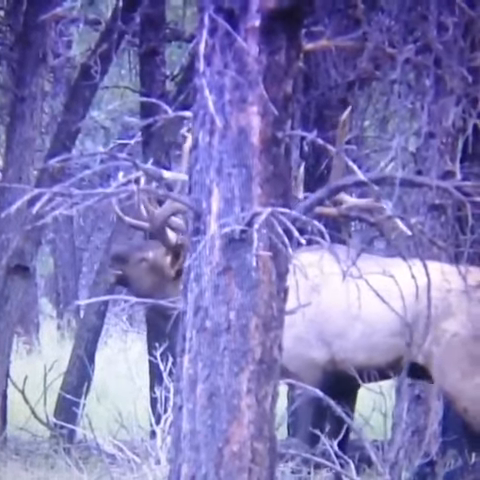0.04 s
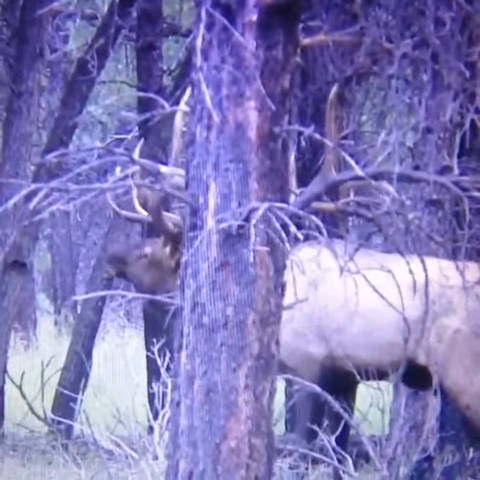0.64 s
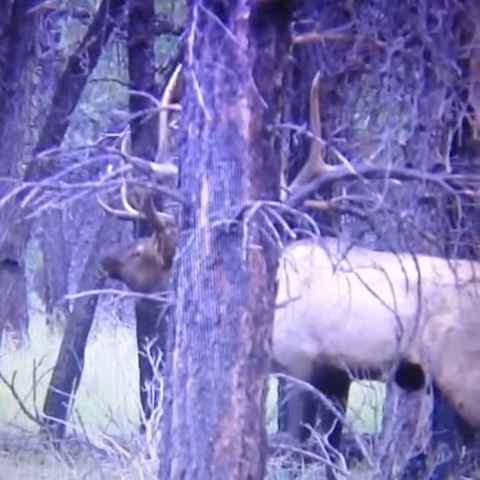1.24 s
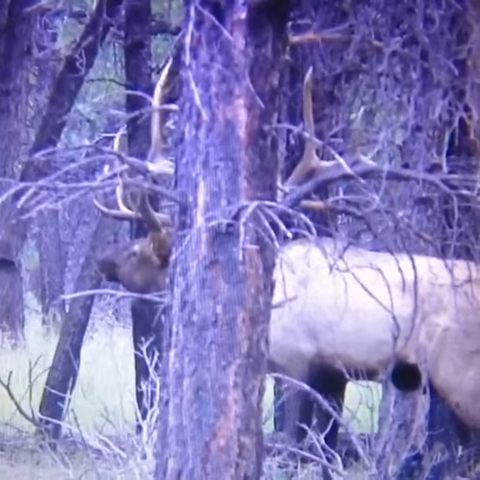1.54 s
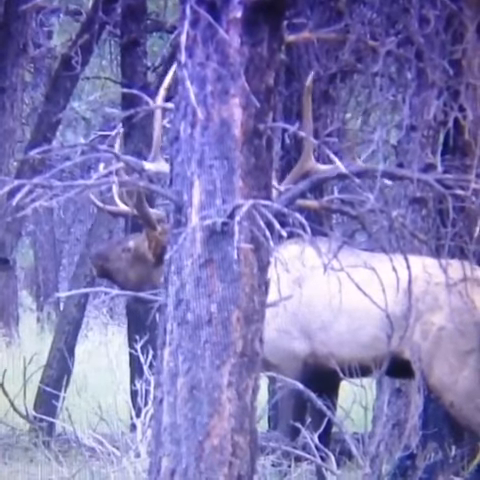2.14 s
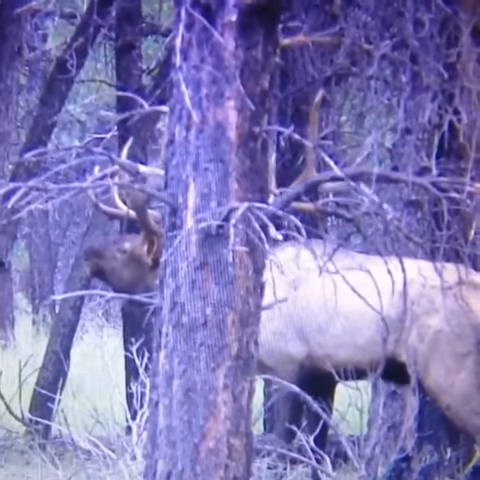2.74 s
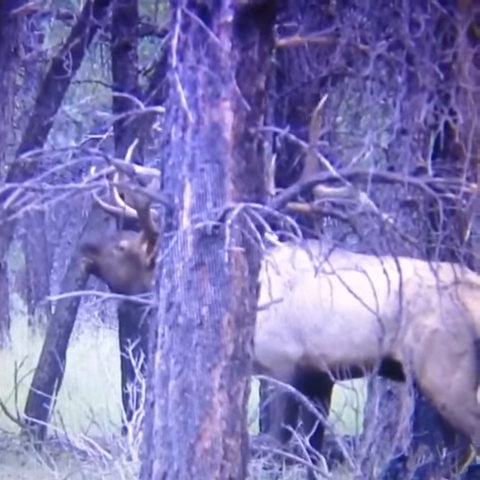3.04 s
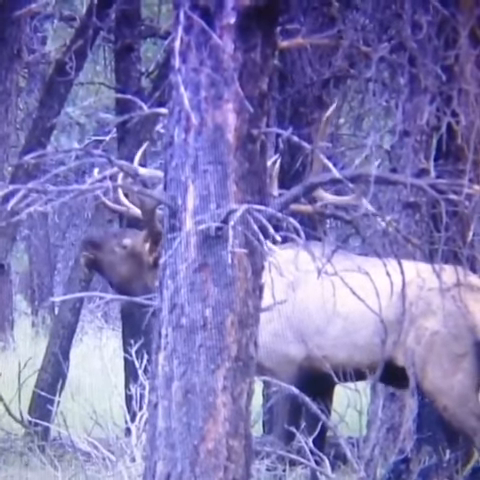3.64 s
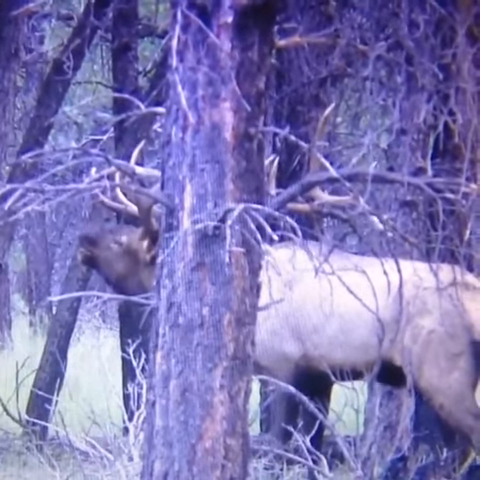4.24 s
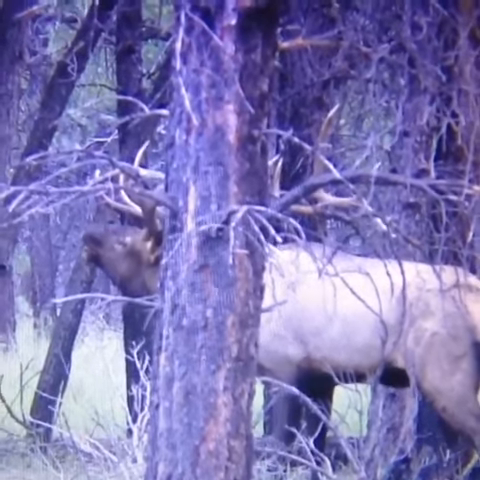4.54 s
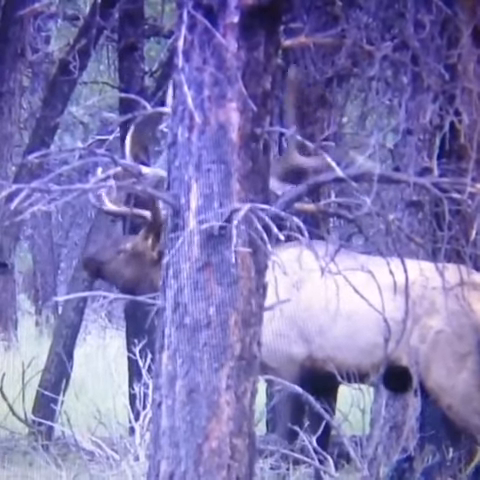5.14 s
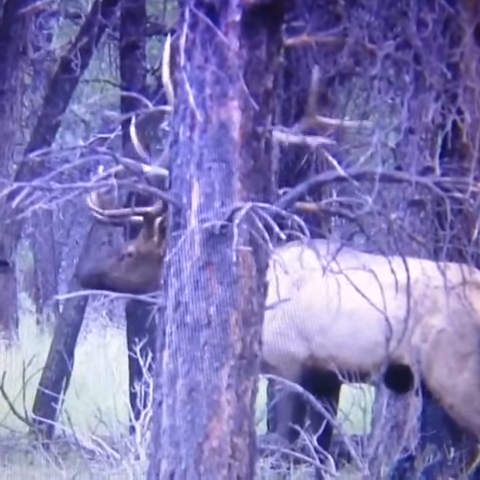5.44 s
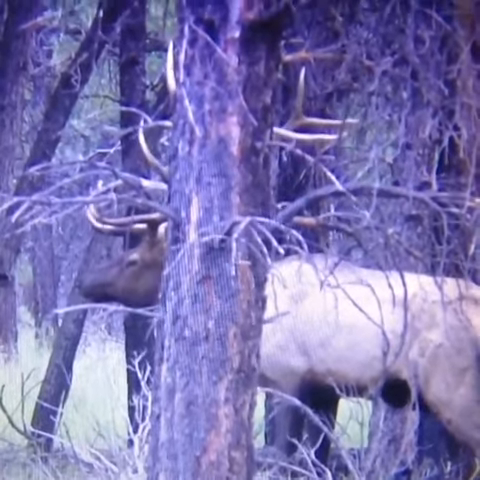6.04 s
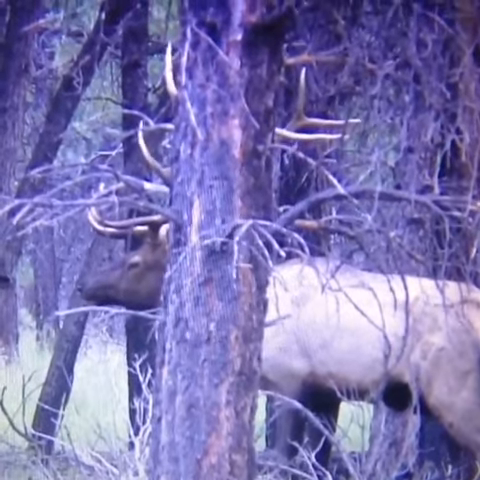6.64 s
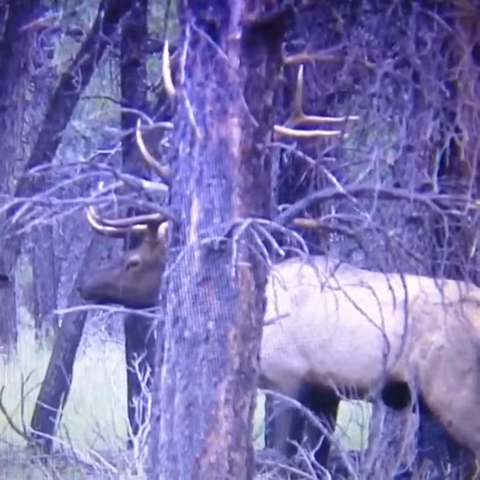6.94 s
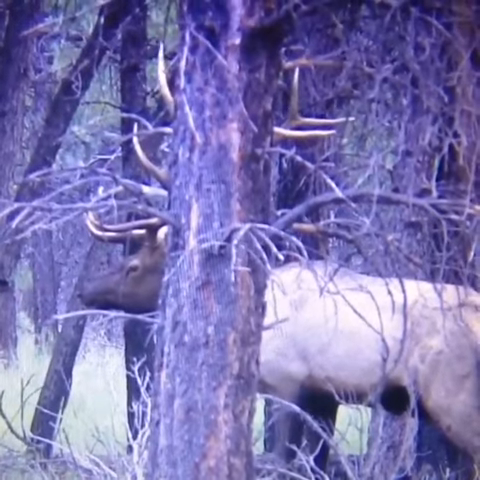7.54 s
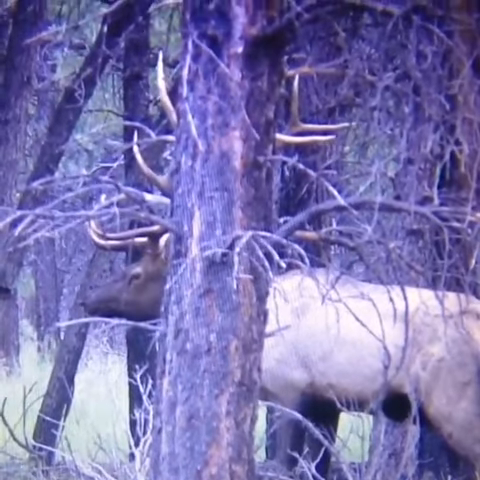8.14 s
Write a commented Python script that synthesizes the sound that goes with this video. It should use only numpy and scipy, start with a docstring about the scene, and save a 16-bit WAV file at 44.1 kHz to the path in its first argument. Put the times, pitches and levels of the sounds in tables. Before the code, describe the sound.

A bull elk ends a hoarse roar with a falling whistle that echoes through a quiet wood. About two seconds in he bugles, a rough voice under a high tone, then chuckles three times, each a yelp, a grunt and a gasp. Two fainter gasps follow. The camera, humming and hissing softly throughout, is knocked once, and another bull answers with two faint, distant notes.

```python
"""A bull elk in a quiet wood ends a hoarse roar with a falling whistle. Two seconds in he bugles, then
chuckles three times, each a yelp, a grunt and a gasp, and gasps faintly twice more. He has two voices:
slow, rough vocal folds that excite the resonances of his long throat, and a high whistle that they
modulate. Trunks reflect each call and the wood reverberates. Near six seconds the camera, which hums and
hisses throughout, is knocked once; then another bull answers with two notes from far off."""
import sys
import numpy as np
from scipy import signal
from scipy.fft import rfft, irfft
from scipy.io import wavfile
from scipy.ndimage import uniform_filter1d

SR = 44100
rng = np.random.default_rng(int(sys.argv[2]) if len(sys.argv) > 2 else 0)


def transcribe(u):
    """Save the signal u as a 16-bit wav file named by the first command-line argument.

    u: samples, shape (n,) or (channels, n), limited to [-1, 1]; the rate is SR.
    q: integer samples, one column per channel.
    """
    v = np.clip(np.atleast_2d(u).T, -1, 1)
    q = np.round(v * 32767).astype(np.int16)
    wavfile.write(sys.argv[1], SR, q)


N = 365148
TIME = np.arange(N) / SR
FREQS = np.maximum(np.arange(8193) * SR / 16384, 1)


def undb(db):
    """Decibels to amplitude ratio."""
    return 10 ** (np.asarray(db) / 20)


def unit(x):
    """Normalisation to rms 1."""
    return x / np.sqrt(np.mean(x ** 2))


def walk(per_s):
    """Low-pass noise: a smooth random drift of rms 1."""
    hold = max(int(SR / per_s), 1)
    steps = np.repeat(rng.standard_normal(N // hold + 1), hold)
    return unit(uniform_filter1d(steps, hold)[:N])


def between(start, end):
    """Control times a millisecond apart."""
    return np.arange(start, end, .001)


def arch(t, peak_s, rise_s, release_s, depth_db):
    """Triangular envelope in dB: from depth_db up to 0 and back."""
    return np.interp(t, [peak_s - rise_s, peak_s, peak_s + release_s], [depth_db, 0, depth_db])


def track(*columns):
    """Control rows from curves and constants."""
    return np.column_stack(np.broadcast_arrays(*columns))


def controls(rows):
    """Linear interpolation: a soft gate over the rows' time span, then each column at every sample."""
    s, *columns = np.transpose(rows)
    gate = uniform_filter1d(1. * ((TIME >= s[0]) & (TIME <= s[-1])), size=128)
    return [gate] + [np.interp(TIME, s, c) for c in columns]


def colour(x, gain):
    """Minimum-phase filter with the given gain at FREQS."""
    cepstrum = irfft(np.log(gain + 1e-6))
    half = len(cepstrum) // 2
    causal = np.r_[cepstrum[0], 2 * cepstrum[1:half]]
    response = irfft(np.exp(rfft(causal, 2 * half)))[:half]
    return signal.fftconvolve(x, response)[:len(x)]


def slope(points):
    """Spectral envelope through (Hz, dB) points."""
    hz, db = np.transpose(points)
    return undb(np.interp(np.log(FREQS), np.log(hz), db))


def no_bass(x, hz):
    """Radiation loss: a source smaller than the wavelength acts as a high-pass."""
    return signal.sosfilt(signal.butter(2, hz, "high", fs=SR, output="sos"), x)


# Spectrum of the hiss. Each row: frequency in Hz, relative level in dB.
HISS_SPECTRUM = [(30, -33.5), (85, -9), (160, -2), (240, 1.5), (420, -5.5), (720, -2), (1060, -0.5),
                 (1600, -5), (3100, -10), (4100, -6), (5000, -10), (5700, -5.5), (7400, -2.5), (9000, -12),
                 (15000, -18)]
def camera(hum_hz=120, knock_s=5.899, knock_hz=300, knock_decay_s=.0012):
    """Damped oscillation: the housing is knocked once, over steady hum and hiss."""
    hum = np.sqrt(2) * undb(-63) * np.sin(2 * np.pi * hum_hz * TIME)
    hiss = undb(-61) * unit(colour(rng.standard_normal(N), slope(HISS_SPECTRUM)))
    age = np.maximum(TIME - knock_s, 0)
    knock = -undb(-31.5) * np.sin(2 * np.pi * knock_hz * age) * np.exp(-age / knock_decay_s)
    return hum + hiss + no_bass(knock, hz=169)


# Echo spectra of close trees, deep forest and far slopes. Each row: frequency in Hz, gain in dB.
NEAR_SPECTRUM = [(100, -12), (200, -3), (400, -4.5), (650, 7.5), (920, -8), (1270, 6), (1600, 1), (1850, 5),
                 (2300, 6.5), (3000, 0), (6000, -4.5)]
FOREST_SPECTRUM = [(100, -11.5), (200, 2), (400, -5.5), (700, 4.5), (920, -9), (1060, 1), (1290, 1.5),
                   (1600, 0.5), (1850, 0.5), (2300, 0.5), (3000, 3.5), (6000, -15)]
SLOPES_SPECTRUM = [(100, -22.5), (600, -14), (1080, 2), (1600, -8), (2300, -4), (4000, -30)]
def scatter(onset_s=.032):
    """Multiple scattering: an impulse response of three noise tails that decay exponentially."""
    t = TIME[:3 * SR]
    build_up = (1 - np.exp(-2 * (t / onset_s) ** 2)) ** 2
    clumps = undb(walk(32)[:len(t)]) * build_up
    response = 0
    for db, t60_s, spectrum in ((-11, .84, NEAR_SPECTRUM), (-11, 2.58, FOREST_SPECTRUM),
                                (-19, 6.6, SLOPES_SPECTRUM)):
        tail = rng.standard_normal(len(t)) * clumps * np.exp(-np.log(1000) * t / t60_s)
        response = response + undb(db) * colour(tail / np.linalg.norm(tail), slope(spectrum))
    return response


def trunk(x, delay_s, db, cutoff_hz, scattered, spread_s=.0044):
    """Specular and diffuse reflection: a sharp echo from the trunk, a smeared one from the branches."""
    delayed = np.interp(TIME - delay_s, TIME, x, left=0)
    echo = no_bass(no_bass(delayed, cutoff_hz), cutoff_hz)
    t = TIME[:SR // 20]
    branches = rng.standard_normal(len(t)) * np.exp(-t / spread_s)
    smeared = signal.fftconvolve(echo, branches / np.linalg.norm(branches))[:N]
    return undb(db) * (np.sqrt(1 - scattered) * echo + np.sqrt(scattered) * smeared)


# The nearest trees; thin ones return no bass.
# Each row: delay in seconds, gain in dB, low cutoff in Hz, share of power scattered by branches.
NEAR_TREES = [(0.0347, -6, 60, 0.2), (.0416, -7, 950, 0.9), (0.0563, -6, 950, .7), (0.079, -11, 900, .5)]
def wood(x, flicker_rad=1.1):
    """Multipath interference: after early echoes, the tail flickers between two sets of paths."""
    early = sum(trunk(x, *row) for row in NEAR_TREES)
    turn = flicker_rad * walk(30)
    tail = sum(share * signal.fftconvolve(x, scatter())[:N] for share in (np.cos(turn), np.sin(turn)))
    return early + tail


def throat(modes, skirt=1.69):
    """Formants: the summed gain of steep resonances; the mouth radiates little bass."""
    power = sum(undb(db) ** 2 / (1 + (2 * (FREQS - hz) / width) ** 2) ** skirt for hz, width, db in modes)
    return np.sqrt(power / (1 + (150 / FREQS) ** 8))


def folds(rows, modes, jitter=.05, shimmer_db=3, alternate_db=0):
    """Source and filter: uneven pulses of the folds, each with a puff of air, excite the throat."""
    gate, hz, db, rough = controls(rows)
    rough = np.clip(rough, 0, 1)
    cycles = np.cumsum(hz * (1 + jitter * rough * walk(140))) / SR
    count = np.floor(cycles)
    pulse_db = shimmer_db * rough * walk(200) + alternate_db * np.cos(np.pi * count)
    pulses = np.diff(count, prepend=0) * np.sqrt(SR / hz) * undb(pulse_db)
    air = unit(np.exp(-(cycles % 1) / .35) * rng.standard_normal(N))
    source = np.sqrt(1 - rough ** 2) * pulses + rough * air
    return gate * undb(db) * colour(source, unit(throat(modes)))


def whistle(rows, fold_hz=212, shake=.68, waver=.017, drift=.002995, uneven=.71):
    """Modulation: the folds shake the pitch and strength of three harmonics into side bands."""
    gate, hz, db, octave_db, shaken = controls(rows)
    phase = 2 * np.pi * np.cumsum(hz * (1 + drift * walk(30) + waver * shaken * walk(120))) / SR
    fold_phase = 2 * np.pi * np.cumsum(fold_hz * (1 + .1005 * walk(90))) / SR
    flutter = np.sin(fold_phase) + uneven * walk(220)
    third_db = np.minimum(octave_db, -6) - 17
    tone = np.sin(phase) + undb(octave_db) * np.sin(2 * phase) + undb(third_db) * np.sin(3 * phase)
    depth = shake * shaken
    return np.sqrt(2) * gate * undb(db) * tone * (1 + depth * flutter) / np.sqrt(1 + depth ** 2)


# The far bull's answer. Each row: start in seconds, length in seconds, relative level in dB.
FAR_NOTES = [(6.177, 0.11, -68), (6.362, 0.32, -68)]
def far_note(s, length_s, db, hz=1066, attack_s=.022):
    """Attack and decay: a nearly pure whistle of steady pitch sets in quickly and fades."""
    t = between(s, s + length_s)
    envelope_db = arch(t, s + attack_s, attack_s, length_s - attack_s, -17)
    return whistle(track(t, hz, db + envelope_db, -19, 0))


# Formants of a gasp. Each row: centre in Hz, width in Hz, relative gain in dB.
GASP_FORMANTS = [(261, 145, -20), (693, 79, -14.5), (875, 70, -5.5), (1054, 30, 1.5), (1226, 163, -8.5),
                 (1444, 90, -10.5), (1646, 200, -15.5), (1970, 240, -24), (2450, 240, -31)]
# Gasps of the chuckle. Each row: peak time, rise and release in seconds, top pitch in Hz,
# levels of folds, hoot and wheeze in dB before radiation loss.
GASP_EVENTS = [(3.388, .08, 0.04, 296.6, -42, -57, -39.5), (3.827, .07, 0.049, 301.1, -41.5, -44.5, -36),
               (4.29, .11, 0.064, 310.1, -43.5, -45, -36), (4.645, 0.088, 0.087, 223.4, -60.5, -61, -57),
               (4.77, .06, .06, 221.6, -53, -68, -60)]
def gasp(s, rise_s, release_s, top_hz, db, hoot_db, wheeze_db):
    """Rising glides: rough folds and a clear hoot climb in pitch; a wheeze sweeps up at the peak."""
    low_hz, climb_s, hoot_lead_s = 206.5, .042, .015
    t = between(s - rise_s, s + release_s)
    hz = low_hz + (top_hz - low_hz) * np.exp(np.minimum(t - s + hoot_lead_s, 0) / climb_s)
    voice_db = db + arch(t, s, rise_s, release_s, -10.5)
    voice = folds(track(t, hz, voice_db, .45), GASP_FORMANTS, jitter=.0469, shimmer_db=4)
    hoot_swell_db = arch(t + hoot_lead_s, s, .025, release_s / 4, -14)
    hoot = whistle(track(t, hz, hoot_db + hoot_swell_db, -24, .445), waver=.0594)
    wheeze_hz, octaves_per_s, half_s = 950, 14, .022
    t = between(s - half_s, s + half_s)
    sweep_hz = wheeze_hz * 2 ** (octaves_per_s * (t - s))
    sweep_db = wheeze_db + arch(t, s, half_s, half_s, -15.5)
    wheeze = whistle(track(t, sweep_hz, sweep_db, -31, .36), waver=.0301)
    return voice + hoot + wheeze


# Formants of a grunt. Each row: centre in Hz, width in Hz, relative gain in dB.
GRUNT_FORMANTS = [(275, 180, -3), (621, 130, -14), (1134, 350, -10), (1596, 270, -11), (2330, 130, -14),
                  (2490, 140, -15), (2860, 100, -26.5), (3300, 180, -27.5)]
# Grunts that end the bugle and each yelp.
# Each row: peak time, rise and release in seconds, pitch at the peak in Hz, source level in dB.
GRUNT_EVENTS = [(2.722, 0.027, 0.036, 255, -42), (3.161, .01, 0.042, 287.6, -43.5),
                (3.618, .012, 0.035, 232.4, -43.5), (4.055, .01, 0.027, 219, -46)]
def grunt(s, rise_s, release_s, hz, db, sag_octaves_per_s=14, rough=.42):
    """Forced resonance: on a push of the chest the folds beat, sag in pitch and ring the throat."""
    t = between(s - rise_s, s + release_s)
    pitch_hz = hz * 2 ** (-sag_octaves_per_s * (t - s))
    return folds(track(t, pitch_hz, db + arch(t, s, rise_s, release_s, -11), rough), GRUNT_FORMANTS)


# Formants that a falling whistle passes. Each row: centre in Hz, width in Hz, gain in dB.
WHISTLE_FORMANTS = [(261, 140, -7.5), (518, 65, 1), (636, 49, -2), (926.6, 62, -.5), (1050, 51, 3.5),
                    (1278, 55, 2.5), (1595, 67, 0), (1841, 100, -3.5), (2270, 120, -5.5), (2560, 210, 2)]
def caught(hz, pull=.7, reach_hz=65):
    """Frequency pulling: a sliding whistle clings to each resonance, then jumps to the next."""
    return hz + sum(pull * (centre - hz) * np.exp(-.5 * ((hz - centre) / reach_hz) ** 2)
                    for centre, _, _ in WHISTLE_FORMANTS)


# Whistles of the roar, the bugle and three yelps. Each row: start, lead-in, break and end in seconds,
# first, full and lowest pitch in Hz and fall in Hz per second (before pulling), relative held and
# falling levels in dB, held and falling shake from 0 to 1, ratio of fold pitch to whistle pitch.
FALLING_WHISTLES = [(0, .036, .14, .33, 1900, 1690, 900, 4200, -43, -27, .5, .32, .15),
                    (2.595, .004, 2.688, 2.73, 948, 930, 260, 30000, -21, -31, .1, .6, .2),
                    (3.084, .039, 3.143, 3.178, 1640, 1572, 1030, 26000, -27.5, -26.5, .05, .62, .2),
                    (3.558, .002, 3.59, 3.634, 1590, 1570, 600, 22000, -35, -30.5, .05, .75, .19),
                    (4.024, .001, 4.027, 4.068, 1450, 1430, 640, 20000, -37, -30, .25, .8, .17)]
def falling_whistle(start, lead_s, break_s, end, first_hz, full_hz, last_hz, fall_hz_per_s,
                    held_db, fall_db, held_shake, fall_shake, fold_share):
    """Register break: a soft note swells, then the folds take hold and it slides down, growing richer."""
    soft_db, swell_s, takeover_s, release_s = -41, .013, .0059, .0056
    strongest_hz, lowest_fold_hz = 980, 153
    t = between(start, end)
    swell = 1 - np.exp(-np.maximum(t - start - lead_s, 0) / swell_s)
    fallen_s = np.maximum(t - break_s, 0)
    broken = np.minimum(fallen_s / takeover_s, 1)
    hz = np.maximum(first_hz + (full_hz - first_hz) * swell - fall_hz_per_s * fallen_s, last_hz)
    hz = hz + broken * (caught(hz) - hz)
    note_db = soft_db + (held_db - soft_db) * swell
    slide_db = fall_db + np.interp(hz, [219, 440, strongest_hz, 1393], [-12, -8, 0, -4.5])
    release_db = np.interp(t, [end - release_s, end], [0, -14.5])
    db = (1 - broken) * note_db + broken * slide_db + release_db
    octave_db = np.minimum(-23 - 19 * np.log2(hz / strongest_hz), -9)
    octave_db -= 21.5 * (1 - swell)  # purer until it has swollen
    shaken = held_shake + (fall_shake - held_shake) * broken
    fold_hz = np.interp(TIME, t, np.maximum(fold_share * hz, lowest_fold_hz))
    rows = track(t, hz, db, octave_db, shaken)
    return whistle(rows, fold_hz, shake=1.15, waver=.0281, drift=.00502, uneven=.26)


# Formants of the roar and of its rasp. Each row: centre in Hz, width in Hz, relative gain in dB.
ROAR_FORMANTS = [(218.4, 50, -5.5), (264, 45, -3.5), (528, 40, -10), (672.5, 98, -11.5), (920, 60, -7),
                 (1043, 144, -6), (1294, 22, -5.5), (1480, 160, -20), (1830, 150, -15.5), (2210, 50, -8),
                 (2330, 80, -2.5), (2442, 96, -8), (2649, 53, -15.5)]
RASP_FORMANTS = [(3450, 57, -5.5), (3780, 200, 0), (4180, 200, 6), (4480, 300, -3), (5150, 300, -7),
                 (7045, 3400, -19)]
# Course of the roar. Each row: time in seconds, pitch in Hz, source level in dB,
# roughness (1 or more is all air), chest tone level in dB.
ROAR_CONTOUR = [(0, 193.3, -26.5, 0.86, -44), (.06, 189.7, -36, 0.72, -46), (.14, 185.6, -34, 0.62, -55.5),
                (0.216, 183.9, -39.5, .55, -42), (.285, 175.2, -35, .6, -51),
                (.32, 153.8, -42, 1.03, -67.5), (.36, 143.4, -55, 0.74, -82)]
def roar(growl_hz=53, growl_db=4, growl_fade_s=.2, rasp_fade_db_per_s=60):
    """Amplitude modulation: hoarse folds and forced air throb in a fading growl over a chest tone."""
    s, hz, db, rough, chest_db = np.transpose(ROAR_CONTOUR)
    voice = folds(track(s, hz, db, rough), ROAR_FORMANTS, jitter=.08, shimmer_db=4.5)
    rasp = folds(track(s, hz, -45 - rasp_fade_db_per_s * s, .89), RASP_FORMANTS)
    throb = np.sin(2 * np.pi * np.cumsum(growl_hz * (1 + .25 * walk(60))) / SR)
    growl = undb(growl_db * np.exp(-TIME / growl_fade_s) * throb)
    chest = whistle(track(s, hz, chest_db, -23, .23), fold_hz=36.7, waver=.13)
    return growl * (voice + rasp) + chest


# Clear partials of the bugle.
# Each row: start and end in seconds, first and last pitch in Hz, peak level in dB, shake from 0 to 1.
BUGLE_PARTIALS = [(2.19, 2.42, 220, 370, -58.5, .2), (2.18, 2.32, 785, 870, -56, 0.4),
                  (2.297, 2.496, 1090, 1090, -39, 0.41), (2.315, 2.502, 930, 920, -37, 0.41),
                  (2.53, 2.594, 1020, 900, -40, .3)]
def bugle_partial(start, end, first_hz, last_hz, db, shaken):
    """Linear glide: a partial moves between two pitches while its power follows a half sine."""
    t = between(start, end)
    along = (t - start) / (end - start)
    hz = first_hz + (last_hz - first_hz) * along
    swell_db = 10 * np.log10(np.sin(np.pi * along) + 1e-4)
    return whistle(track(t, hz, db + swell_db, -34.5, shaken), fold_hz=53.1)


# Formants of the bugle. Each row: centre in Hz, width in Hz, relative gain in dB.
BUGLE_FORMANTS = [(210.8, 71, -24), (288, 98, -19), (497, 50, -21), (829, 30, -12), (921, 82, -2.5),
                  (1061, 55, -4), (1245, 90, -9), (1419, 60, -12), (1694, 41, -16.5), (1820, 88, -34.5),
                  (2443, 57, -25.5), (2650, 120, -33)]
# The folds in the bugle. Each row: time in seconds, pitch in Hz, source level in dB.
BUGLE_CONTOUR = [(1.98, 72.29, -70), (2.225, 85.66, -64), (2.26, 92.1, -45.5), (2.3, 98.3, -40.5),
                 (2.335, 104.3, -39.5), (2.39, 107.1, -40), (2.5, 109.5, -39.5), (2.575, 106.7, -36.5),
                 (2.61, 106.1, -47.5), (2.69, 102.2, -42.5), (2.74, 94.4, -57)]
# Its held tone. Each row: time in seconds, pitch in Hz, levels of tone and octave in dB before trim.
HELD_CONTOUR = [(2.04, 654, -76, -85.5), (2.112, 639.5, -63, -62.5), (2.195, 642, -64, -70.5),
                (2.23, 650, -76, -74), (2.338, 646.5, -44, -38.5), (2.43, 646.7, -59.5, -37.5),
                (2.495, 661, -45, -37.5), (2.586, 638.8, -41.5, -36), (2.61, 635.7, -47.5, -39.5)]
def bugle(rough=.46, trim_db=2, octave_trim_db=-1):
    """Biphonation: the folds tighten and swell while a whistle holds its own note among clear partials."""
    s, hz, db = np.transpose(BUGLE_CONTOUR)
    voice = folds(track(s, hz, db, rough), BUGLE_FORMANTS, jitter=.035, shimmer_db=2.5, alternate_db=4)
    partials = sum(bugle_partial(*row) for row in BUGLE_PARTIALS)
    s, hz, db, octave_db = np.transpose(HELD_CONTOUR)
    held = track(s, hz, db + trim_db, octave_db - db + octave_trim_db, .25)
    return voice + partials + whistle(held, fold_hz=53.05, waver=.03)


def scene():
    """Superposition: the near bull direct and reflected, the far bull by echo alone, and the camera."""
    gasps = sum(gasp(*row) for row in GASP_EVENTS)
    whistles = sum(falling_whistle(*row) for row in FALLING_WHISTLES)
    whistles = colour(whistles, throat(WHISTLE_FORMANTS, skirt=.95))  # a glide swells on each resonance
    bull = roar() + bugle() + no_bass(gasps + whistles, hz=149)
    bull += sum(grunt(*row) for row in GRUNT_EVENTS)
    answer = sum(far_note(*row) for row in FAR_NOTES)
    return (bull + wood(bull + 2 * answer) + camera())[None]


def record(dry):
    """Band limiting: a steep low-pass removes the highest treble."""
    top_hz = 15300
    return signal.sosfilt(signal.ellip(10, .2, 80, top_hz, fs=SR, output="sos"), dry)


dry = scene()
out = record(dry)
transcribe(out)
```